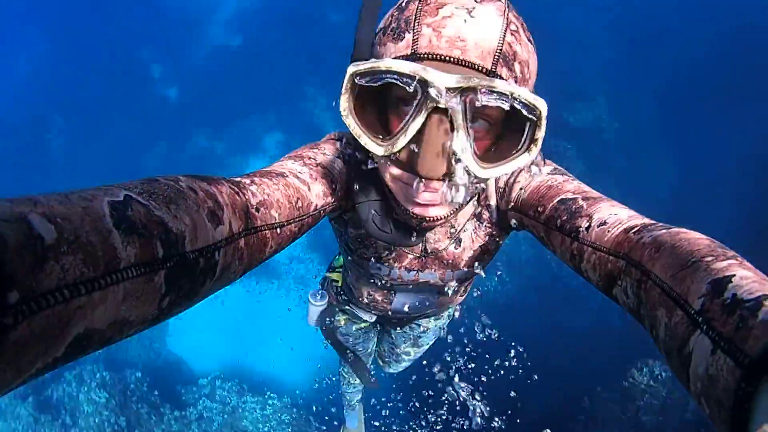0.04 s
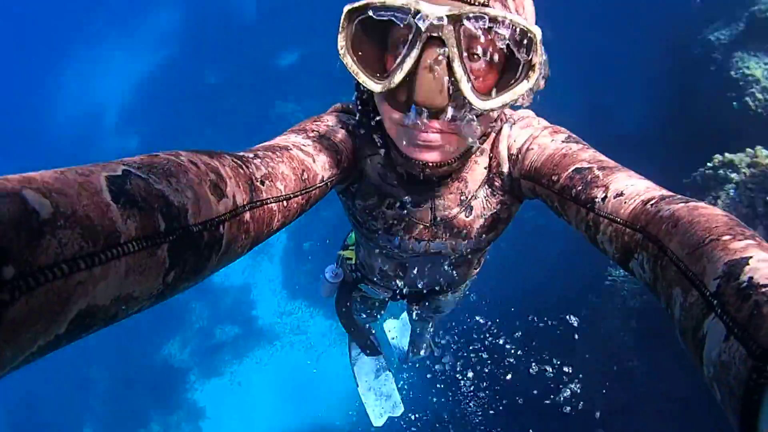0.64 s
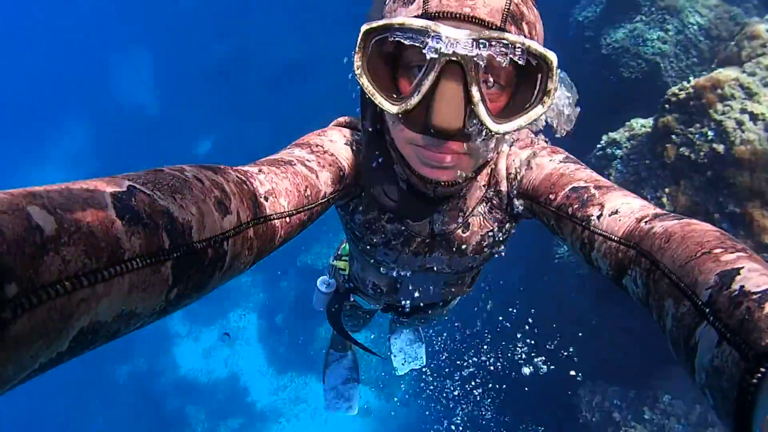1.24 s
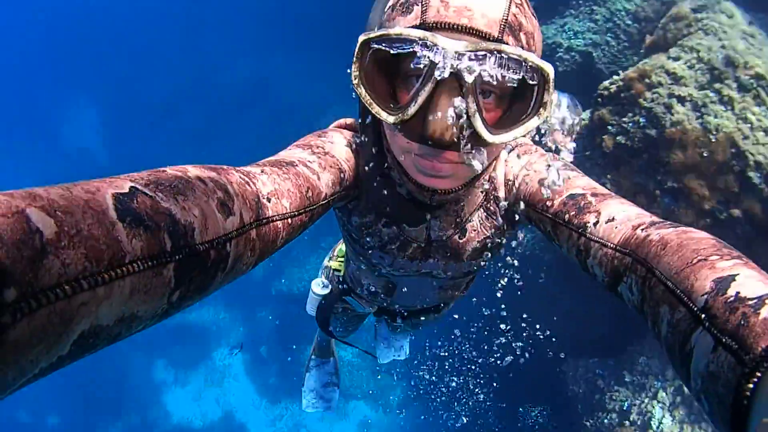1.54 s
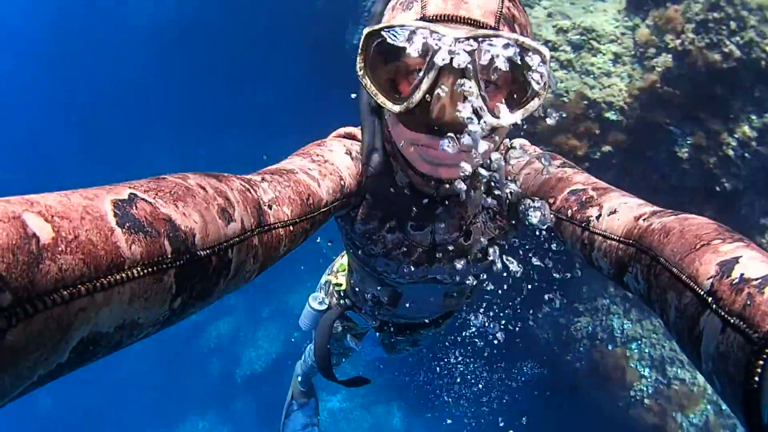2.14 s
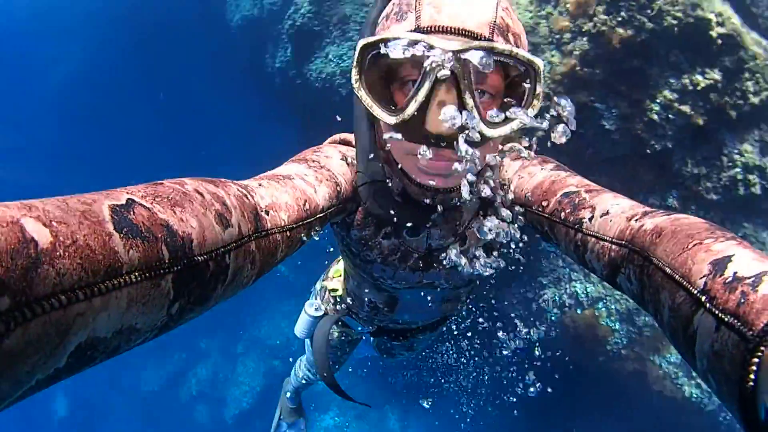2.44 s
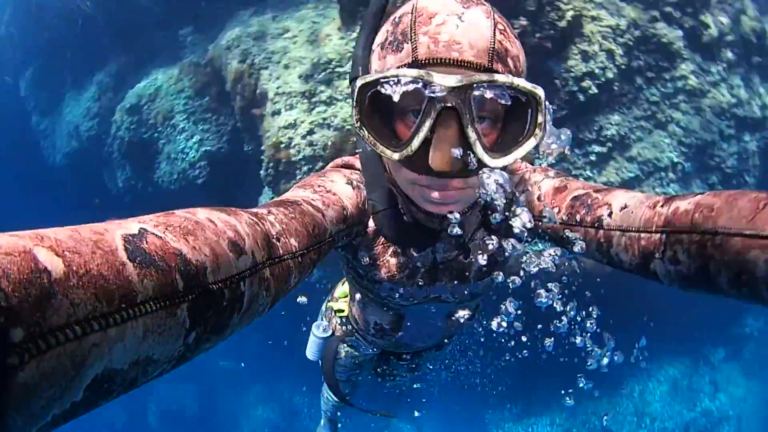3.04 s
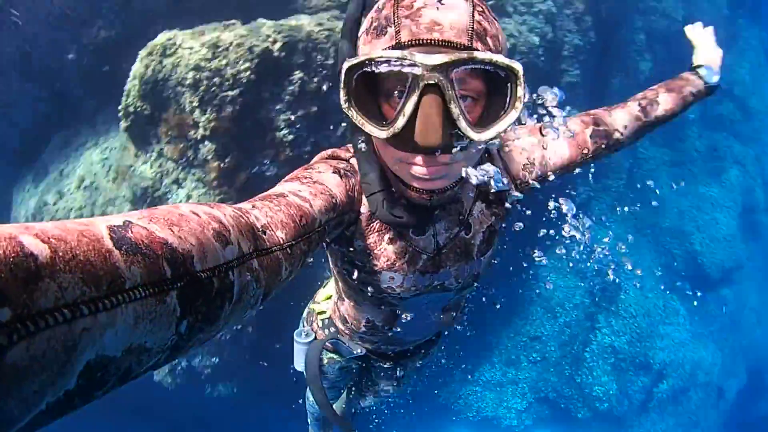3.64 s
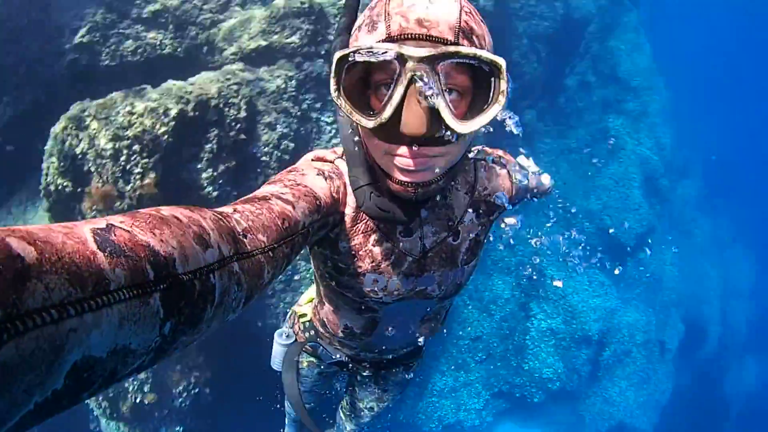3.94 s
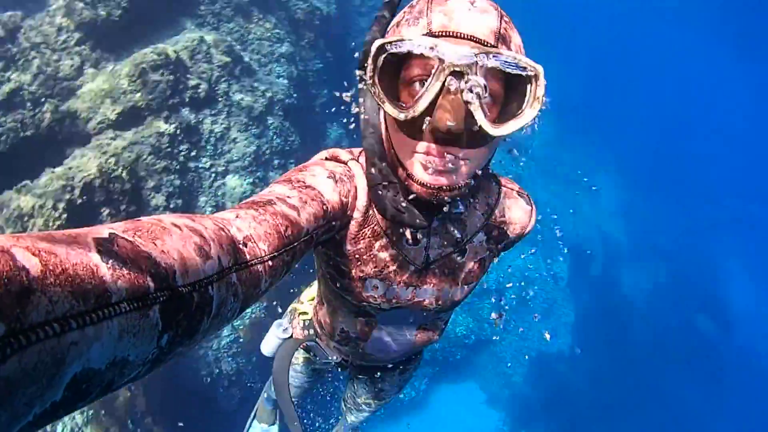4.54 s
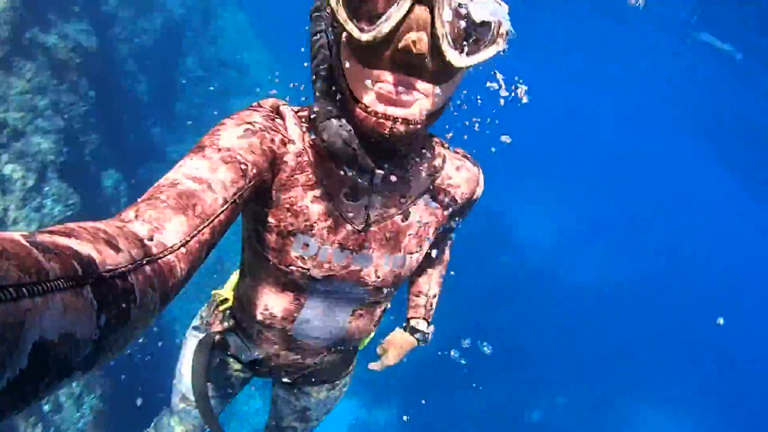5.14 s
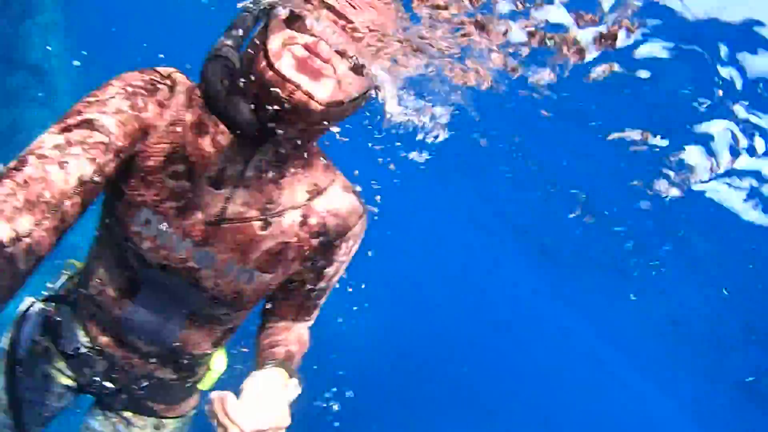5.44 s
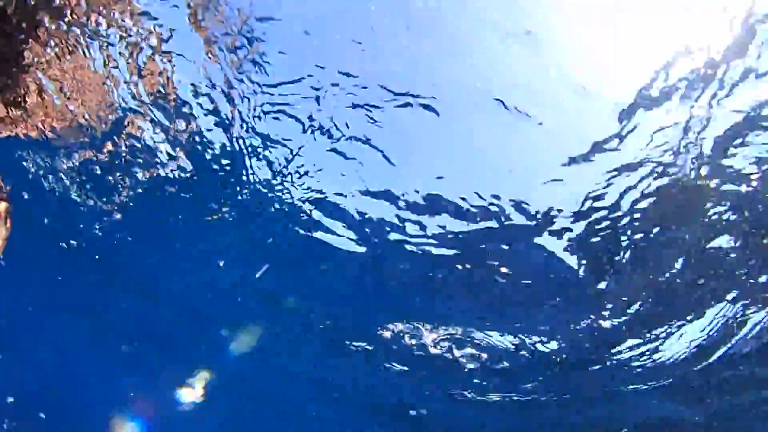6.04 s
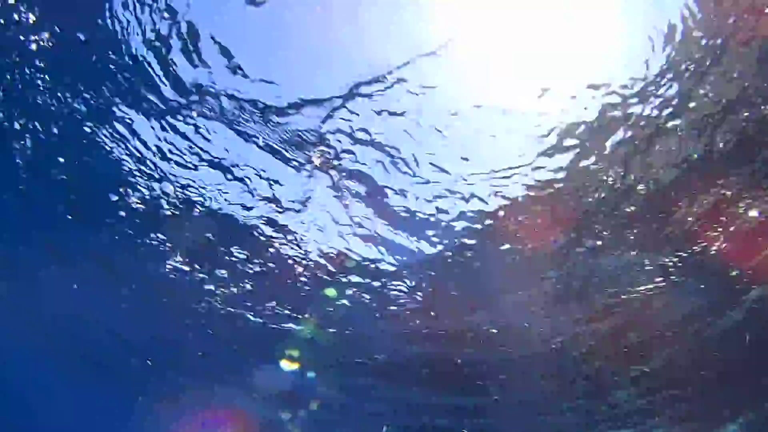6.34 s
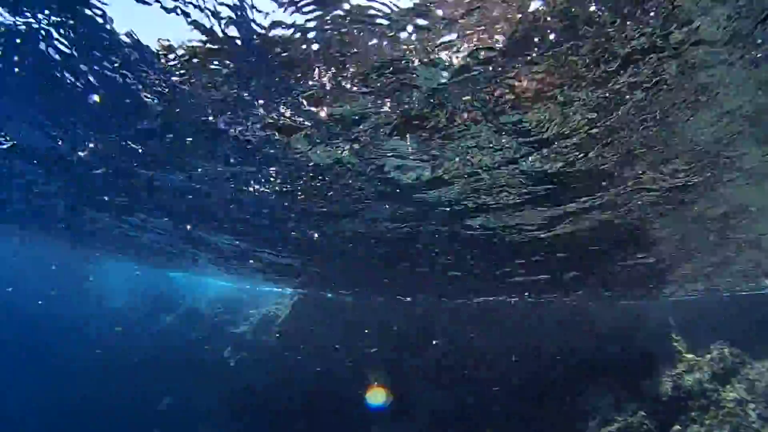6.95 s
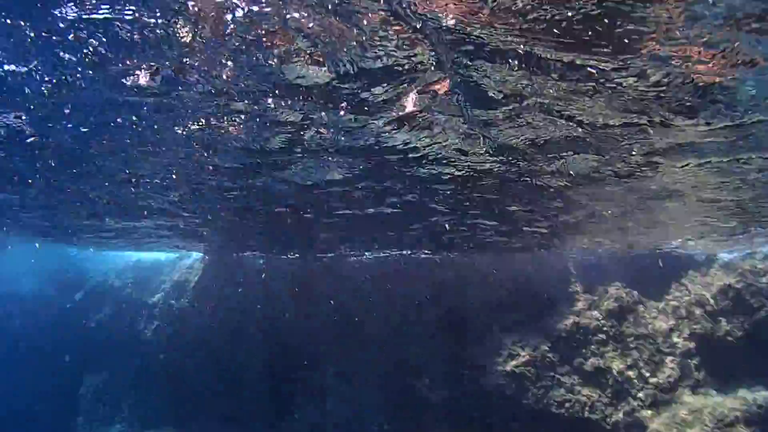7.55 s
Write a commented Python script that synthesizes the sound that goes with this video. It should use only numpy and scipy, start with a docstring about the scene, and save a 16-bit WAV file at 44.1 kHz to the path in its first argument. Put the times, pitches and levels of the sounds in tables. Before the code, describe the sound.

Muffled water flow with small plops and scattered clicks, then loud churning and sloshing against an underwater camera housing.

```python
"""In the sea above a reef, a free diver rises to the surface holding a camera in a sealed housing.
Shrimp snap, water streams past and small bubbles plop over the soft tick of the camera. Near the surface,
gushes of air and water churn and slap against the housing, whose walls and trapped air colour everything.
The camera's limiter holds the gushes level and ducks the reef behind them."""
import sys
import numpy as np
from scipy import signal
from scipy.fft import rfft, irfft
from scipy.io import wavfile
from scipy.ndimage import uniform_filter1d

SR = 44100
rng = np.random.default_rng(int(sys.argv[2]) if len(sys.argv) > 2 else 0)


def wav_record(signal):
    """Record a signal, one row per channel, as 16-bit PCM in the file named by sys.argv[1]."""
    frames = np.transpose(np.atleast_2d(signal))
    bounded = np.clip(frames, -1, 1)
    # unit amplitude maps onto the largest positive 16-bit level
    quanta = np.round(bounded * 32767).astype(np.int16)
    wavfile.write(sys.argv[1], SR, quanta)


N = 343980

# The housing's low rumble and midrange gurgle, as EQ curves: (frequency [Hz], level [dB])
RUMBLE_EQ = [(15, -56), (25, -29), (67, 3.5), (86, 8), (151, -4), (193, -15), (294, 0), (423, -9.5),
             (503, -6.5), (702, -17.5), (800, -52), (1040, -63), (1760, -120)]
GURGLE_EQ = [(350, -2.5), (560, -7.5), (720, -5), (930, -3), (1060, -3), (1170, -2), (1330, -6), (1570, -2),
             (1750, -15.5), (1950, -30), (2200, -13), (2500, -21.5), (2800, -19), (3700, -18.5),
             (5000, -73)]
# Their hollower versions, close under the surface: (frequency [Hz], level [dB])
SHALLOW_RUMBLE_EQ = [(25, -20), (75, -7.5), (140, -13.5), (205, 1.5), (245, -5.5), (290, 5), (350, -15),
                     (450, -17), (510, -8.5), (580, -3.5), (700, -24), (1200, -39)]
SHALLOW_GURGLE_EQ = [(500, -35), (700, -1), (970, -8), (1130, 5), (1270, -1), (1420, -8.5), (1600, 0.5),
                     (1900, -22), (2250, -8.5), (2700, -19), (3700, -2.5), (5000, -62)]
# Gushes hitting the housing:
# (time [s], length [s], air pocket pitch [Hz], level [dB], foam offset [dB], gurgle offset [dB])
GUSHES = [(1.2, 0.0076, 242, -43.5, -1, 14), (2.777, 0.012, 260.6, -23, -15, -14),
          (2.797, 0.023, 306, -33, -3, -25), (2.818, 0.0262, 290, -24, -8.5, -15),
          (2.849, 0.0444, 205.3, -31.5, -12, -17.5), (2.894, 0.032, 289, -28.5, -3, -4),
          (3.998, 0.04, 300, -35, -21, -10), (4.844, 0.02, 312, -23, -31, -2.5),
          (5.058, 0.0099, 203, -23.5, -19.5, -6), (5.111, 0.017, 195, -18, -26, -15),
          (5.152, .0087, 219, -16.5, -36, -12.5), (5.173, 0.0074, 255, -19, -21, -9.5),
          (5.191, 0.0618, 195, -13.5, -36, -14.5), (5.266, 0.014, 169, -7.5, -45, -17.5),
          (5.291, 0.047, 196.4, -11, -22.5, -10), (5.429, 0.013, 315.6, -9, -50.5, -16.5),
          (5.456, 0.039, 196, -20.5, -45, -11.5), (5.487, 0.067, 259, -19.5, -30, -11.5),
          (5.58, 0.041, 124, -17, -26.5, -16.5), (5.626, 0.03, 204, -14, -25.5, -9),
          (5.665, 0.1, 228.7, -25.5, -23, -9), (5.765, 0.042, 157.7, -19, -25.5, -10),
          (5.846, 0.029, 173, -13.5, -26, -9), (5.893, 0.00887, 164.3, -12, -36, -15.5),
          (5.92, 0.018, 153.5, -13.5, -38, -22.5), (5.972, 0.0083, 192.4, -11, -29.5, -17),
          (5.991, .019, 125, -6.5, -35, -17), (6.022, 0.014, 202, -18.5, -25, -10.5),
          (6.128, 0.017, 196.4, -19, -27, -11), (6.153, 0.045, 202, -20.5, -19.5, -8),
          (6.246, 0.0292, 117, -12, -33.5, -15.5), (6.275, 0.08, 111.5, -9.5, -35, -13),
          (6.349, 0.034, 104, -17, -30, -28), (6.409, 0.09, 125, -30.5, -36, -46),
          (6.484, 0.013, 231, -26, -10.5, -13), (6.955, 0.064, 378.5, -32.5, 1, -11.5),
          (7.005, 0.043, 240, -24.5, -5.5, -14.5), (7.056, 0.04, 130, -36.5, -27, -32),
          (7.156, 0.063, 277.2, -21.5, -6.5, -10.5), (7.255, 0.016, 300, -37.5, 8, -31),
          (7.328, 0.026, 336.6, -17, -12, -12.5), (7.455, 0.018, 260.7, -34, -3.5, -9.5),
          (7.515, 0.067, 290, -34.5, -10.5, -2.5), (7.677, 0.0117, 282, -37, -2, -4),
          (7.767, 0.028, 240, -30, -35, -38)]


def gushes(glug_db=-2.5, churn_db=-1.5, slosh_db=-11.5, flutter_db=4.5, shallow_from_s=6.9, size=2 ** 14):
    """Each gush glugs, churns and sloshes, gurgles in the housing's middle modes and fizzes with foam."""
    body, fizz = np.zeros(N), np.zeros((2, N))
    deep = response(RUMBLE_EQ), housing_ring(response(GURGLE_EQ))
    shallow = response(SHALLOW_RUMBLE_EQ), response(SHALLOW_GURGLE_EQ)
    froth = blips(per_s=900, low_hz=522, high_hz=2399.5, q=19, spread_db=0, size=N + size)
    froth += 0.51 * grains(per_s=7700, spread_db=1, size=N + size)
    tiny_bubbles = blips(per_s=1100, low_hz=4250, high_hz=8480, q=26, spread_db=3, size=N + size)
    for start, length, hz, db, foam_db, gurgle_db in GUSHES:
        now = slice(int(start * SR), int(start * SR) + size)
        rumble_ir, gurgle_ir = shallow if start > shallow_from_s else deep
        pocket_ir = resonance(rumble_ir, hz, width_hz=1.11 * hz) + 0.5 * rumble_ir
        slosh_ir = resonance(pocket_ir, hz, width_hz=0.7 * hz)
        flutter = from_db(flutter_db * np.tanh(waver(size)))  # air tears off in gulps
        tone = glug(hz, length, rise_octaves=0.297, wobble_octaves=0.159, size=size)
        pulsing = burst(tone, length, rumble_ir, attack_s=0.00012, release_s=0.032, sag_db=4)
        lumps = flutter * grains(per_s=1800, spread_db=2, size=size)
        churn = burst(lumps, length, pocket_ir, attack_s=0.001, release_s=0.002, sag_db=-0.5)
        noise = rng.standard_normal(size)
        slosh = burst(noise, length, slosh_ir, attack_s=0.017, release_s=0.025, sag_db=2.5)
        low_end = from_db(glug_db) * pulsing + from_db(churn_db) * churn + from_db(slosh_db) * slosh
        add(body, start, from_db(db) * low_end)
        gulps = flutter * froth[now]
        gurgle = burst(gulps, length, gurgle_ir, attack_s=0.00075, release_s=0.0045, sag_db=4)
        add(body, start, from_db(db + gurgle_db) * gurgle)
        for channel in fizz:
            foam = flutter * (tiny_bubbles[now] + grains(per_s=2100, spread_db=3.5, size=size))
            spurt = burst(foam, length, np.ones(1), attack_s=0.0022, release_s=0.00175, sag_db=0.5)
            add(channel, start, from_db(db + foam_db) * spurt)
    return body, fizz / np.sqrt(2)  # two paths share the power


# Water slapping the housing: (time [s], level [dB], boom pitch [Hz])
SLAPS = [(2.8389, -8.5, 254), (2.9348, 0, 85), (4.848, -18, 288), (5.334, -1.5, 278), (6.192, -0.5, 131),
         (7.006, -9.5, 86)]


def slaps(decay_cycles=0.69, edge_decay_s=0.001, edge_gain=0.52):
    """A sharp step of pressure, after which the housing rocks once or twice."""
    out, t = np.zeros(N), np.arange(SR // 10) / SR
    lowpass = signal.butter(2, 1100, fs=SR, output="sos")
    for s, db, hz in SLAPS:
        boom = -np.cos(2 * np.pi * hz * t + 1.01) * np.exp(-t * hz / decay_cycles)
        edge = edge_gain * np.exp(-t / edge_decay_s)
        slap = signal.sosfilt(lowpass, boom - edge)
        add(out, s, from_db(db) * slap / np.abs(slap).max())
    return out


# Foreground plops, one bubble each: (time [s], pitch [Hz], level [dB], swell time [s])
BUBBLES = [(.029, 1110, -18.5, .0029), (.391, 371.7, -27.5, 0.0032), (.513, 1193, -37, 0.0049),
           (1.085, 289, -28.5, 0.0044), (1.203, 1170, -9, 0.0016), (1.634, 166, -32.5, .0069),
           (1.738, 361.4, -32.5, 0.0071), (1.776, 337, -30, 0.0073), (1.89, 177, -30, 0.0044),
           (2.328, 348.2, -30.5, 0.0067), (3.118, 322, -32, 0.0093), (3.183, 355, -29.5, 0.0027),
           (3.406, 368, -30, 0.0037), (3.405, 583, -33.5, 0.0055), (4.003, 343, -23.5, 0.00563),
           (4.066, 1680, -42.5, 0.0021), (4.292, 1564, -36.5, 0.0021), (4.488, 317, -34, 0.0066),
           (4.581, 1470, -41, 0.0025), (4.649, 2300, -40, 0.0024), (4.706, 2400, -41, .0022),
           (4.847, 1100, -14, 0.00082), (5.042, 2210, -33, 0.0019), (5.309, 1187, -7.5, 0.0049),
           (5.332, 1461, -9.5, 0.0024), (5.354, 1660, -28, 0.0029), (5.388, 740, -19, 0.0016),
           (5.41, 4970, -27.5, 0.0012), (5.487, 1120, -17, 0.0079), (5.517, 1110, -13.5, 0.0051),
           (5.557, 4740, -14.5, 0.0015), (5.556, 5260, -15, 0.0012), (5.643, 1035, -6, 0.003),
           (5.69, 1538, -17, 0.0034), (5.845, 1031, -18, 0.0062), (5.973, 1030, -13.5, 0.0017),
           (5.991, 1063, -17.5, 0.0042), (6.022, 1080, -16, 0.0041), (6.201, 150, -10, 0.0083),
           (6.287, 1102, -18, 0.0092), (6.322, 1027, -16.5, 0.0061), (6.452, 1180, -34.5, .0026),
           (6.6, 1080, -31, 0.0011), (6.679, 141, -22, 0.003), (6.825, 1380, -30.5, 0.0012),
           (6.854, 1580, -35.5, 0.0031), (7.021, 85, -24.5, 0.02), (7.199, 558, -22, .004),
           (7.199, 1408, -16, 0.0035), (7.258, 282, -28, 0.0059), (7.332, 451, -18.5, 0.0075)]


def bubbles(rise=0.0084, overtone_ratio=1.85, overtone_db=-27):
    """A bubble swells and fades quickly, its pitch creeping upward, with a faint overtone."""
    out, t = np.zeros(N), np.arange(SR // 10) / SR
    for s, hz, db, swell in BUBBLES:
        age = t / swell
        phase = 2 * np.pi * hz * t * (1 + rise * np.tanh(age - 1))
        tone = np.sin(phase) + from_db(overtone_db) * np.sin(overtone_ratio * phase)
        add(out, s, from_db(db) * age * np.exp(1 - age) * tone)
    return out


# Big bubbles nearing the surface: (time [s], length [s], centre pitch [Hz], level [dB])
GLUGS = [(5.484, 0.069, 519, -27), (5.765, 0.044, 345, -16.5), (5.836, 0.0732, 476, -21.5),
         (6.276, 0.076, 607.6, -30)]


def rising_glugs(size=2 ** 13):
    """Each big bubble swells and fades on one clear, rising note."""
    out = np.zeros(N)
    for start, length, hz, db in GLUGS:
        swell = np.sin(np.pi * np.minimum(np.arange(size) / SR / length, 1))
        tone = glug(hz, length, rise_octaves=0.37, wobble_octaves=0.02, size=size)
        add(out, start, from_db(db) * swell * tone)
    return out


# Close-up shrimp snaps: (time [s], level [dB])
SNAPS = [(.254, -25.5), (0.354, -4), (0.4683, -14.5), (0.5772, -22), (1.026, -29), (1.1914, -20.5),
         (1.35, -23.5), (1.396, -18), (1.4349, -23.5), (1.4495, -18), (1.5312, -22.5), (1.8795, -16),
         (2.043, -26), (2.49, -9), (2.5088, -10), (2.782, -10.5), (3.015, -25), (3.307, -27), (3.6752, -25),
         (3.688, -22), (3.7751, -18.5), (3.8401, -13.5), (3.897, -23), (4.2083, -18), (4.39, -13),
         (4.65, -12), (4.677, -21), (4.706, -24), (4.799, -18), (4.897, -21), (4.987, -22), (6.66, -25),
         (6.768, -22), (7.049, -13), (7.1645, -5), (7.5348, -13), (7.582, -20.5), (7.6052, -7),
         (7.632, -17), (7.7095, -15)]


def near_shrimp(edge_db=-10.5, size=2 ** 11):
    """Single loud snaps: each holds for a few milliseconds and favours a wall mode of its own."""
    out, t = np.zeros((2, N)), np.arange(size) / SR
    crack = np.exp(-(t / 0.002) ** 2)
    tail = from_db(-4) * np.exp(-t / 0.0039) + from_db(-24.5) * np.exp(-t / 0.013)
    for s, db in SNAPS:
        scatter = (crack + tail) * rng.standard_normal((2, size))
        wall_mode = 2.7 * resonance(scatter, rng.uniform(4880, 8510), width_hz=350)
        edge = np.diff(scatter, prepend=0) * np.exp(-t / 0.0012)  # gets straight through the wall
        snap = through_wall(scatter + wall_mode, side_db=-9.5) + from_db(edge_db) * edge
        add(out, s, from_db(db) * snap / np.abs(snap.mean(axis=0)).max())
    return out


# The bite of the rasp: (frequency [Hz], level [dB])
RASP_EQ = [(900, -28), (1550, 10), (1900, -10), (2300, 7.5), (2800, -13.5), (3250, -1), (3800, -13),
           (4600, 2.5), (6500, -17), (12000, -20.5), (16000, -36)]
# Rasp accents: (time [s], length [s], level [dB])
RASPS = [(1.201, 0.004, -39), (2.487, 0.0072, -40), (2.8, 0.026, -40.5), (2.898, 0.022, -36),
         (4.844, 0.0135, -37), (6.185, 0.014, -35.5), (6.486, 0.0099, -36), (7.163, 0.014, -46)]


def rasps(size=2 ** 13):
    """Water tears off the housing in short spurts of dense, harsh crackle."""
    out, ir = np.zeros(N), response(RASP_EQ)
    for start, length, db in RASPS:
        crackle = grains(per_s=4000, spread_db=4, size=size)
        rasp = burst(crackle, length, ir, attack_s=0.0023, release_s=0.00366, sag_db=4.5)
        add(out, start, from_db(db) * rasp)
    return out


# Air pockets burbling, and housing modes rung by the splash, each on one note: (time [s], length [s], pitch
# [Hz], level [dB])
RINGS = [(.4, 0.62, 152, -42), (3.0, 1.35, 358.6, -52), (3.62, 0.053, 636, -50),
         (6.989, 0.0664, 474, -29), (7.158, 0.0677, 1520, -31.5), (7.16, .068, 2140, -39.5)]


def ringing_notes(q=14):
    """The water nudges each ringing note again and again; the burble swells and fades."""
    out = np.zeros(N)
    for start, length, hz, db in RINGS:
        nudges = grains(per_s=400, spread_db=1, size=int(length * SR))
        burble = resonance(resonance(nudges, hz, hz / q), hz, hz / 2)
        add(out, start, from_db(db) * rms_one(burble * signal.windows.tukey(len(burble), 0.5)))
    return out


# Fader ride for the broken surface trickling between gushes: (time [s], level [dB])
TRICKLE_FADER = [(4.95, -79), (5.06, -52), (5.2, -52), (5.33, -57), (5.36, -44), (5.42, -42), (5.5, -34),
                 (5.75, -36.5), (5.9, -49), (6.08, -87), (6.23, -44), (6.31, -35), (6.4, -53), (6.55, -86)]


def trickle(spray_db=-14):
    """Ringing bubbles merge into a slosh at the surface, under an even hiss of spray."""
    level = fader(TRICKLE_FADER)
    notes = blips(per_s=1000, low_hz=513, high_hz=2300, q=22, spread_db=-0.5, count=24)
    slosh = rms_one(housing_ring(colour(notes, GURGLE_EQ)))
    spray = np.array([grains(per_s=7900, spread_db=0) for _ in range(2)])
    return level * slosh, level * from_db(spray_db) * spray


# Dark flow and light tinkle, heard through the housing: (frequency [Hz], level [dB])
FLOW_EQ = [(20, -24), (55, 5.5), (108, -2.5), (151, -0.5), (229, -9), (352, -4.5), (454, -15), (560, -12),
           (698, -21), (900, -30), (1170, -51), (1980, -120)]
TINKLE_EQ = [(500, -3), (750, 11.5), (950, 4), (1170, 12), (1280, 5), (1450, 13), (1650, -3.5), (1900, -17),
             (2250, 3), (2750, -54), (3200, -38), (3800, -13), (5000, -24)]
# Fader rides for the passing water and its simmer of tiny bubbles: (time [s], level [dB])
FLOW_FADER = [(0.0, -44.5), (0.35, -41.5), (0.61, -38), (1.26, -43), (1.67, -42.5), (2.04, -45.5),
              (3.8, -46.5), (4.02, -40), (4.3, -45), (4.8, -44.5), (5.1, -37), (5.38, -31), (5.6, -23),
              (5.9, -24.5), (6.09, -42), (6.32, -29), (6.6, -43.5), (7.1, -43), (7.8, -40)]
SIMMER_FADER = [(0.0, -49), (2.83, -53), (3.12, -61), (4.79, -56), (5.0, -51)]


def stream(flow_db=-1, plop_db=-6.5, wash_db=-7.5, simmer_db=-7, bass_cut_hz=75, full_rumble_s=3.3):
    """Lumpy flow round the housing, its bass growing as the diver rises, with soft plops and a simmer."""
    lumps = from_db(flow_db) * colour(grains(per_s=990, spread_db=2.5), FLOW_EQ)
    thin = signal.sosfilt(signal.butter(1, bass_cut_hz, "high", fs=SR, output="sos"), lumps)
    bass_fade = np.minimum(np.arange(N) / SR / full_rumble_s, 1) ** 2
    flow = thin + bass_fade * (lumps - thin)
    plops = from_db(plop_db) * blips(per_s=40, low_hz=125, high_hz=402.7, q=13.5, spread_db=4)
    soft_plops = signal.sosfilt(signal.butter(2, 650, fs=SR, output="sos"), plops)
    wash = from_db(wash_db) * colour(grains(per_s=2000, spread_db=2), TINKLE_EQ)
    tiny_bubbles = blips(per_s=130, low_hz=845, high_hz=2620, q=15.6, spread_db=3)
    simmer = from_db(simmer_db) * rms_one(colour(tiny_bubbles, TINKLE_EQ))
    return fader(FLOW_FADER) * (flow + soft_plops) + fader(SIMMER_FADER) * (wash + simmer)


# The sheen of the distant hiss: (frequency [Hz], level [dB])
HISS_EQ = [(1470, -40), (2500, -14), (3460, -17), (4400, -19.5), (5210, 1), (5910, 1), (6650, -14.5),
           (7980, 2.5), (9130, -14), (11700, -13.5), (15100, -8.5)]
# Fader ride for the reef bed, dipping while the surface bubble cloud screens it: (time [s], level [dB])
REEF_FADER = [(5.6, 7), (6.42, -13.5), (6.62, 4.5)]


def far_shrimp(per_s=125, crackle_db=-53.7, knock_db=-62, hiss_db=-55.2, hiss_side_db=-60):
    """Countless snaps at all distances: a crackle with a dull knock in it, merging into hiss."""
    t = np.arange(2 ** 11) / SR
    crack = np.exp(-t / 0.00116)
    scatter = from_db(-11) * np.exp(-t / 0.0053)  # off rock and surface
    loudness = from_db(-19 * np.sqrt(rng.random(N)))
    snaps = (rng.random(N) < per_s / SR) * loudness
    power = signal.oaconvolve(snaps ** 2, (crack + scatter) ** 2)[:N]
    drive = rms_one(np.sqrt(np.abs(power))) * rng.standard_normal((2, N))
    crackle = from_db(crackle_db) * through_wall(drive, side_db=-4.5)
    knock = from_db(knock_db) * colour(drive[0], TINKLE_EQ)
    hiss = from_db(hiss_db) * colour(rng.standard_normal(N), HISS_EQ)
    hiss_side = from_db(hiss_side_db) * colour(rng.standard_normal(N), WALL_SIDE_EQ)
    return fader(REEF_FADER) * (crackle + pan(knock + hiss, hiss_side, right_db=3))


# Fader ride for the running camera's tick: (time [s], level [dB])
TICK_FADER = [(0, -39), (2.4, -40.5), (3.3, -48), (7.8, -45)]


def camera_tick(first_s=0.0575, frames_per_s=29.97, hz=1390, width_hz=320, between_db=-10, size=2 ** 10):
    """A short dull rasp on every other frame, with a weaker one on the frames between."""
    out, level, t = np.zeros(N), fader(TICK_FADER), np.arange(size) / SR
    for frame, s in enumerate(np.arange(first_s, N / SR, 1 / frames_per_s)):
        rasp = rng.standard_normal(size) * t * np.exp(-t / 0.00145)
        tick = resonance(resonance(rasp, hz, width_hz), hz, width_hz)
        gain = level[int(s * SR)] * from_db(between_db * (frame % 2))
        add(out, s, gain * tick / np.abs(tick).max())
    return out


# The housing wall's bright ring, in mid and side: (frequency [Hz], level [dB])
WALL_MID_EQ = [(2200, -15.5), (3000, -18.5), (3800, -19.5), (4400, -4.5), (4750, -5.5), (5150, 4.5),
               (5800, 6.5), (6500, -3.5), (7300, -2.5), (8050, 4.5), (8800, -9), (10500, -12.5),
               (12000, -21), (16000, -25)]
WALL_SIDE_EQ = [(1760, -11.5), (3000, -23), (3430, -39), (3970, -23.5), (4260, -3.5), (4760, -74),
                (5070, 3.5), (5630, -6.5), (6760, -10.5), (8000, -6.5), (8700, -20), (9800, -10.5),
                (11500, -18.5), (14800, -14), (16000, -21)]


def through_wall(drive, side_db):
    """Treble rings in the housing wall and reaches the two microphones by different paths."""
    side = from_db(side_db) * colour(drive[1], WALL_SIDE_EQ)
    return pan(colour(drive[0], WALL_MID_EQ), side, right_db=5.5)


def housing_ring(x, hz=1110, width_hz=53, ring_db=-1):
    """Adds the ring of the housing's strongest middle mode."""
    return x + from_db(ring_db) * resonance(x, hz, width_hz)


def glug(hz, length, rise_octaves, wobble_octaves, size):
    """A big air pocket pulsates; its pitch rises and wavers as it deforms; rms 1."""
    progress = np.minimum(np.arange(size) / SR / length, 1)
    pitch = hz * 2 ** (rise_octaves * (progress - 0.5) + wobble_octaves * waver(size))
    return np.sqrt(2) * np.sin(2 * np.pi * np.cumsum(pitch) / SR)


def blips(per_s, low_hz, high_hz, q, spread_db, size=N, count=16):
    """Tiny bubbles born at random, each ringing at the pitch of its own size; rms 1."""
    births = grains(per_s, spread_db, size)
    note = rng.integers(0, count, size)
    pitches = np.geomspace(low_hz, high_hz, count)
    return rms_one(sum(resonance(births * (note == k) + 1e-18, hz, hz / q)
                       for k, hz in enumerate(pitches)))


def grains(per_s, spread_db, size=N):
    """Random clicks of both signs, their levels scattered by spread_db; rms 1."""
    born = rng.random(size) < per_s / SR
    strength = from_db(spread_db * np.minimum(rng.exponential(1, size), 4))
    return rms_one(born * strength * rng.choice([-1, 1], size))


def burst(source, length, ir, attack_s, release_s, sag_db):
    """A spurt that rises, sags and dies, coloured by ir, with the energy of rms 1 over its length."""
    t = np.arange(len(source)) / SR
    onset = 1 - np.exp(-t / attack_s)
    release = np.exp(-np.maximum(t - length, 0) / release_s)
    envelope = onset * from_db(-sag_db * t / length) * release
    sound = signal.fftconvolve(source * envelope, ir)
    return sound * np.sqrt(length * SR) / (np.linalg.norm(sound) + 1e-12)


def waver(size, smooth_samples=300):
    """Smooth random modulation that turns about a hundred times a second; rms 1."""
    smoothed = uniform_filter1d(rng.standard_normal(size), smooth_samples)
    return rms_one(uniform_filter1d(smoothed, smooth_samples))


def response(eq, size=4096):
    """Minimum-phase impulse response of an EQ curve; energy 1."""
    hz, db = np.transpose(eq)
    log_hz = np.log(np.fft.rfftfreq(size, 1 / SR) + 1)
    log_gain = np.log(from_db(np.interp(log_hz, np.log(hz), db)))
    cepstrum = irfft(log_gain)[:size // 2]
    cepstrum[0] = 0
    ir = irfft(np.exp(rfft(2 * cepstrum, size)))
    return ir / np.linalg.norm(ir)


def colour(x, eq):
    return signal.oaconvolve(x, response(eq))[:len(x)]


def resonance(x, hz, width_hz):
    """One ringing mode: a two-pole band-pass."""
    r = np.exp(-np.pi * width_hz / SR)
    gain = (1 - r * r) / 2
    return signal.lfilter([gain, 0, -gain], [1, -2 * r * np.cos(2 * np.pi * hz / SR), r * r], x)


def pan(mid, side, right_db):
    """Mid and side to stereo, the right channel louder by right_db."""
    gains = from_db([[-right_db / 2], [right_db / 2]])
    return np.array([mid + side, mid - side]) * gains / gains.mean()


def fader(rows):
    s, db = np.transpose(rows)
    return from_db(np.interp(np.arange(N) / SR, s, db))


def from_db(db):
    return 10 ** (np.asarray(db) / 20)


def rms_one(x):
    return x / np.sqrt(np.mean(x ** 2) + 1e-20)


def add(out, s, sound):
    at = int(s * SR)
    out[..., at:at + sound.shape[-1]] += sound[..., :N - at]


def scene():
    """The water's body in mono, fizz and shrimp in stereo, all leaning right."""
    body, fizz = gushes()
    slosh, spray = trickle()
    water = body + slosh + rasps() + bubbles() + rising_glugs() + ringing_notes() + slaps() + stream()
    mono = pan(water + camera_tick(), 0, right_db=7)  # long waves move both microphones in step
    return mono + through_wall(fizz + spray, side_db=-3.5) + near_shrimp() + far_shrimp()


def record(dry, ceiling=0.2884, release_db_per_s=85, attack_s=0.000885, sense_samples=64, top_hz=15700):
    """The camera's limiter clamps peaks fast and recovers slowly; a steep low-pass cuts the top."""
    power = uniform_filter1d(dry ** 2, sense_samples).max(axis=0)
    over_db = 10 * np.log10(np.maximum(power / ceiling ** 2, 1))
    ramp = release_db_per_s * np.arange(N) / SR
    held_db = np.maximum.accumulate(over_db + ramp) - ramp
    pole = np.exp(-1 / (attack_s * SR))
    reduction_db = signal.lfilter([1 - pole], [1, -pole], held_db)
    lowpass = signal.ellip(10, 0.1, 80, top_hz, fs=SR, output="sos")
    return signal.sosfilt(lowpass, dry * from_db(-reduction_db))


dry = scene()
out = record(dry)
wav_record(out)
```